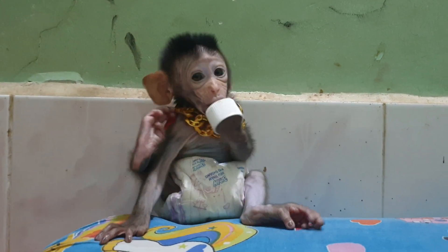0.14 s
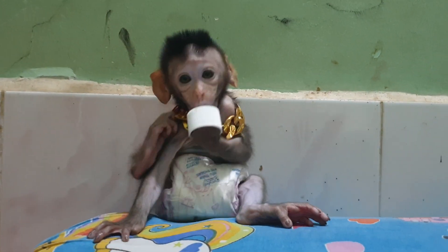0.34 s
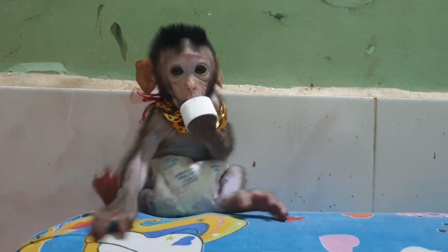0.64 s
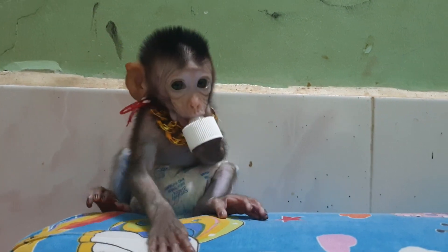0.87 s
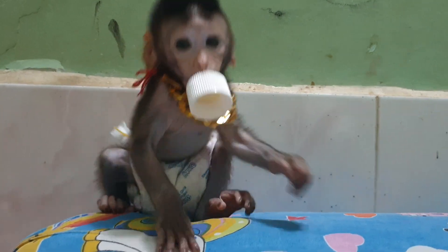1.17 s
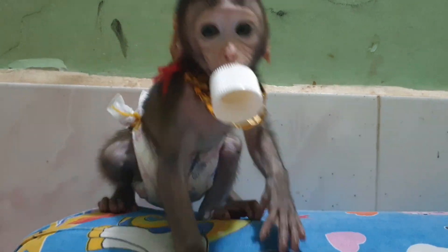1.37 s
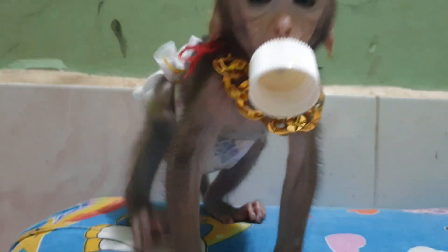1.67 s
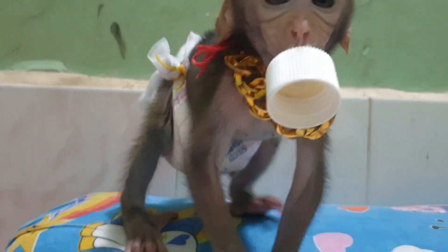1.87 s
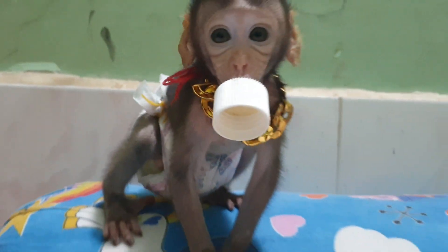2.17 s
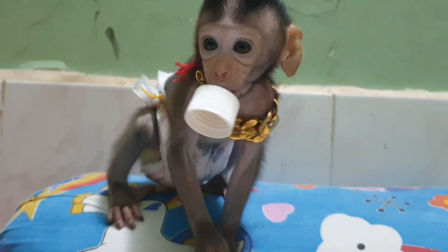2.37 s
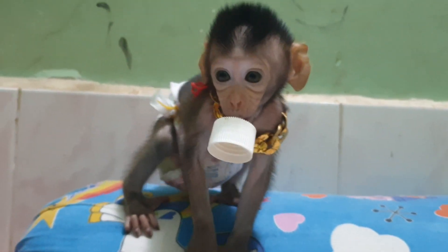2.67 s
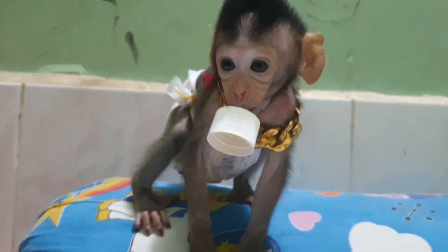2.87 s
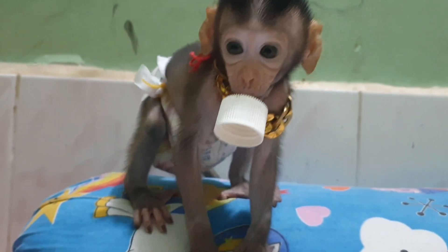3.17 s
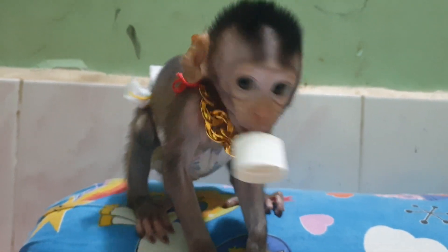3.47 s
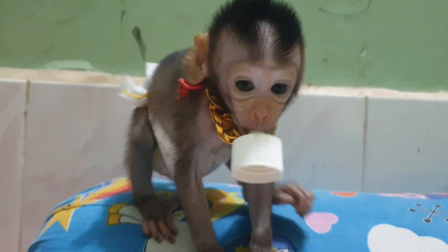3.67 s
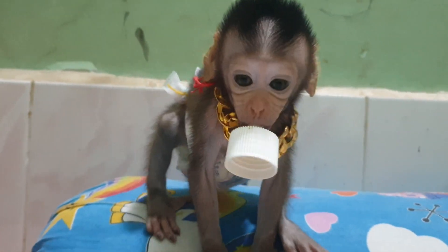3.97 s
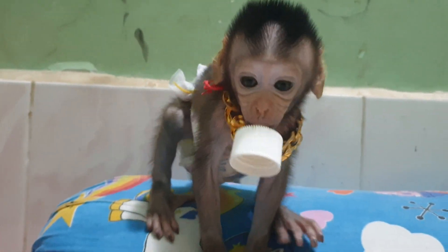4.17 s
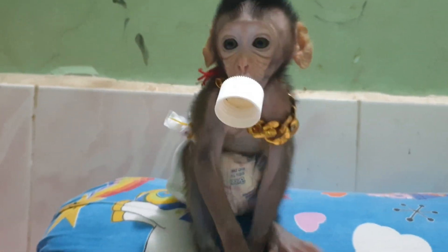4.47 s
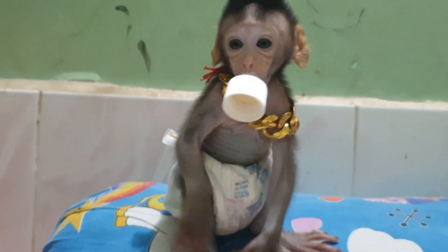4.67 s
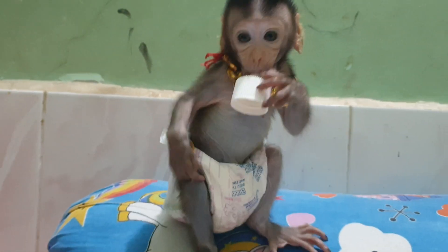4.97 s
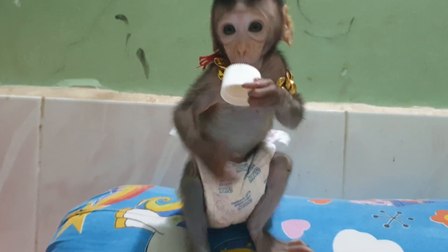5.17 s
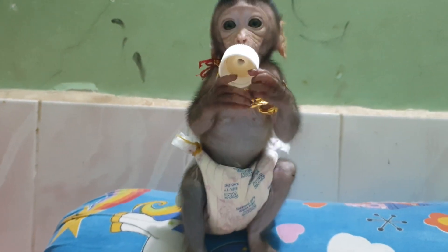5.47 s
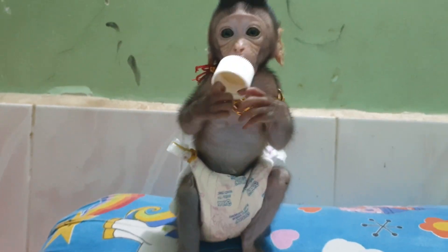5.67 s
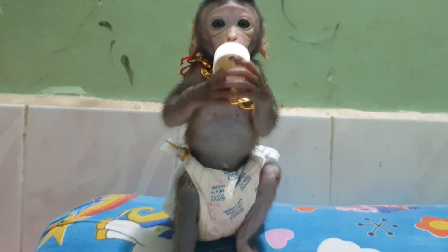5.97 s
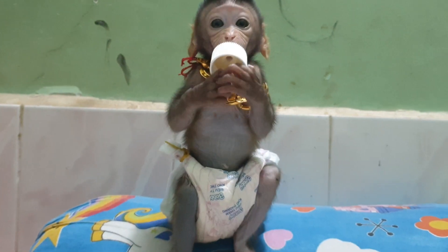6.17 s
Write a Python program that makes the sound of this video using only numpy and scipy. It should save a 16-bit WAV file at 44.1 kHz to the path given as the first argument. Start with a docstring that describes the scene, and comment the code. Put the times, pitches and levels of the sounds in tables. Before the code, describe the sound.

A small tiled room, heard close up in stereo, with steady low hum, rumble and soft, shifting hiss. A light tick of chain or plastic comes at 0.1 s, then at 0.3 s a baby monkey gives a tiny, high, arched squeak, about a twentieth of a second. Very faint ticks follow at 0.7 and 0.9 s. From about 1.4 s a weak coo rises, with a brief pitch flip and a brighter tick near 1.55 s, and at 1.7 s breaks into a louder, sharper squeak with a short tiled echo. Soft low thuds land at 2.0 and 2.4 s. Around 3.3 s there is a barely audible thin wheeze and tick, then gentle rubbing and low scuffing from 3.8 s. At 4.35 s a hard object clacks sharply, chattering briefly, with padded thuds. Faint rustling follows near 5 s; a faint high tone fades in during the last half second.

```python
"""Baby monkey calling in a tiled room

A baby monkey on a mattress, close by, with a plastic cap in its mouth: one short squeak, then a soft rising
coo that breaks into a louder squeak. Its voice is a stack of harmonics shaped by throat resonances.
Chain and cap tick as it crawls, in noise snaps; later a hard object clacks with decaying ringing partials.
The mattress thuds in low sines and rustles in noise, and the monkey wheezes faintly in a narrow noise band.
The room hums, rumbles and hisses; a thin tone ends it."""
import sys
import numpy as np
from scipy import signal
from scipy.fft import rfft, irfft, next_fast_len
from scipy.io import wavfile
from scipy.ndimage import uniform_filter1d, map_coordinates

SR = 44100
rng = np.random.default_rng(int(sys.argv[2]) if len(sys.argv) > 2 else 0)


def persist_wave(psi):
    """Save psi, clipped to +-1, as 16-bit WAV."""
    counts = np.round(np.clip(psi, -1, 1) * 32767).astype(np.int16)
    wavfile.write(sys.argv[1], SR, np.atleast_2d(counts).T)


N = 278623

# the two squeaks: (start [s], length [s], attack [s], top pitch [Hz], level at top pitch [dB],
# bend of the pitch arch [octaves/s^2], roughness at top pitch [0-1])
SQUEAKS = [(.303, .054, 0.0078, 1219, -26.5, 126, 0.06), (1.714, 0.094, 0.0024, 1290, -20, 273, 0.08)]
# path of the coo: (time [s], pitch [Hz], level before trim [dB])
COO_PATH = [(1.435, 1068, -51), (1.451, 1084, -47), (1.515, 1136, -49), (1.539, 1142, -49.5),
            (1.549, 1302, -33), (1.557, 1158, -39.5), (1.575, 1180, -43), (1.665, 1213, -35),
            (1.708, 1230, -35.5)]
# throat and mouth resonances of each call: (frequency [Hz], gain [dB])
FIRST_SQUEAK_THROAT = [(1000, -8), (1220, -.5), (2400, -6.5), (3650, -12.5), (4200, -23), (4870, -7),
                       (5400, -9), (6000, -12), (7300, -25.5), (8450, -21), (9600, -36), (10900, -9.5),
                       (12100, 5.5), (13200, -13), (14500, -30), (15800, -30)]
SECOND_SQUEAK_THROAT = [(1000, -4.5), (1280, -1.5), (2300, 1.5), (2600, -16.5), (3750, -18.5), (4930, 0.5),
                        (5300, -12), (6350, -15), (7600, -28), (8950, -17), (11400, -8.5), (12250, 2.5),
                        (13100, -13), (15400, -32)]
COO_THROAT = [(1200, 0), (2200, -15.5), (2450, -16), (3300, -8.5), (3700, -15.5), (4400, -32), (8000, -53),
              (10800, -34), (13300, -29), (15500, -42)]
# light ticks of chain and cap: (time [s], level before trim [dB], centre of the snap [Hz])
TICKS = [(.1282, -32, 6540), (.6934, -46, 2750), (.8795, -50.5, 5530), (1.5547, -27, 7040),
         (2.0179, -45.5, 5470), (3.3629, -44, 7000), (4.13, -43, 7000)]
# blows of the hard object: (time [s], level of the first contact [dB], contact length [s], its brightness [Hz])
CLACKS = [(4.3532, -18.5, 0.0015, 15000), (4.3737, -31, 0.016, 5000)]
# ringing partials of the object: (frequency [Hz], relative level [dB], 60 dB decay [s])
OBJECT_RINGING = [(910, -17.5, 0.027), (1473, 1, 0.015), (2145, -13.5, 0.023), (3204, -7, 0.044),
                  (3400, -8, .016), (4200, -13, 0.044), (5110, -8, 0.026), (5465, -3, 0.027),
                  (6220, 7, .012), (8140, -17, 0.018), (10000, -14, 0.018), (10850, -6, 0.009),
                  (11930, 0, 0.01)]
# soft thuds of limbs on the mattress: (time [s], level [dB], frequency [Hz])
THUDS = [(2.018, -38.5, 118), (2.41, -39, 75), (4.361, -30.5, 112), (4.4, -31, 71), (4.419, -44, 198),
         (4.451, -34.5, 77)]
# rubs on the mattress, and at 3.3 s a faint thin wheeze of the monkey:
# (middle [s], length [s], level [dB], centre [Hz], sharpness [Q])
RUBS_AND_WHEEZE = [(.094, 0.1, -58.5, 6500, 3.1), (.92, 0.038, -59, 9200, 8), (1.499, 0.17, -58, 5970, 7.6),
                   (1.536, .06, -53.5, 11800, 9), (2.6, .25, -70, 4800, 4), (3.3, 0.22, -70, 4430, 26),
                   (3.411, 0.14, -61, 7150, 3.6), (3.828, .18, -60.5, 5030, 1.6),
                   (4.021, .14, -57, 387.6, 53), (4.098, 0.11, -58, 5070, 2),
                   (4.439, 0.048, -52.5, 292, 5.6), (4.995, .55, -60, 5930, 0.5)]
# extra phase between left and right port, as sound bends round the body between them: (frequency [Hz], lag [rad])
PORT_LAG = [(20, 0), (300, .2), (1250, .75), (2550, 1.7), (3100, 4.1), (3800, 4.3), (5000, 6.1),
            (6200, 7.5), (7100, 11.6), (9000, 12.3), (12200, 14.8), (16000, 20)]
# decay of the room: (frequency [Hz], 60 dB decay [s])
ROOM_DECAY = [(150, 0.21), (1200, 0.48), (2500, 0.47), (3600, 0.39), (4900, 0.45), (6300, 0.25),
              (8000, 0.25), (12000, 0.31), (16000, 0.1)]
# early echoes off the walls: (delay [s], level [dB])
WALL_ECHOES = [(.0062, -23), (.0135, -24), (.0225, -21), (.0385, -23), (.046, -22)]
# colour of the room's noise: (frequency [Hz], relative level [dB per Hz])
ROOM_TONE = [(25, -23), (50, -3), (90, -12.5), (170, -16.5), (400, -16), (650, -16), (1150, -15),
             (1600, -17.5), (2300, -24), (2850, -24), (3450, -29), (4600, -25), (7200, -24), (9500, -28),
             (12500, -25.5), (16000, -41)]
# how alike the room's noise is at the two ports: (frequency [Hz], likeness [0-1])
PORT_LIKENESS = [(100, .99), (450, .92), (900, .7), (1550, .72), (2300, .2), (12000, .22)]
# hum of an appliance: (frequency [Hz], level before trim [dB])
HUM = [(48.4, -67), (70.0, -62), (102.3, -62.5)]
# swells of the low noise: (time [s], rumble before trim [dB], air before trim [dB])
LOW_NOISE = [(0.0, -55.5, -59.5), (1.87, -53.5, -62.5), (2.18, -58, -63), (2.59, -55.5, -63),
             (3.71, -62.5, -62.5), (4.08, -54, -60), (6.02, -52.5, -60), (6.32, -54.5, -61)]
# swells of the hiss: (time [s], level before trim [dB])
HISS = [(0.0, -60.5), (0.93, -67), (1.34, -65.5), (1.69, -58), (1.97, -66.5), (2.27, -67), (4.1, -62.5),
        (5.14, -62.5), (5.38, -65.5), (6.32, -64)]


def squeak(row, throat):
    """A quick arch of pitch; level, roughness and brightness follow its sag from the top."""
    start, length, attack, top_hz, db, bend, rough = row
    top_after_s, scoop_octaves, scoop_s = 0.0175, 0.284, 0.0022
    t = np.arange(0, length, 1 / SR)
    # the pitch scoops up from below into the arch
    scoop = scoop_octaves * np.exp(-t / scoop_s)
    sag = bend * (t - top_after_s) ** 2 + scoop
    # off the top pitch the voice is weaker and rougher
    gain = amp(db - 60.5 * sag) * fade(t, attack, release=0.0053)
    roughness = rough + 0.67 * sag
    # the voice is most pressed, so brightest, a little below the top
    bright_db_per_octave = 1.46 - 21.5 * np.abs(sag - 0.064)
    pitch = top_hz * 2 ** -sag
    return call(start, pitch, gain, roughness, bright_db_per_octave, throat, jitter=0.05, rasp=1.2)


def coo():
    """A soft rising note with one flip of pitch; it grows purer as it swells."""
    end_s, trim_db, fade_s = 1.716, 1.8, 0.0034
    t = np.arange(COO_PATH[0][0], end_s, 1 / SR)
    pitch, db = curves(COO_PATH, t)
    gain = amp(db + trim_db) * fade(t, fade_s, fade_s)
    # the weaker the note, the brighter its overtones
    bright_db_per_octave = 0.24 * (-37.5 - db)
    return call(t[0], pitch, gain, 0.092, bright_db_per_octave, COO_THROAT, jitter=0.08, rasp=1, waver_db=2.5)


def call(start, pitch, gain, rough, bright_db_per_octave, throat, jitter, rasp, waver_db=0):
    """One call: the harmonics of the vocal folds sweep through the throat's resonances."""
    size = len(pitch)
    smooth_pitch = uniform_filter1d(pitch, size=90)
    shaky_pitch = smooth_pitch * (1 + jitter * rough * wobble(902, size))
    phase = 2 * np.pi * np.cumsum(shaky_pitch) / SR
    voice = np.zeros(size)
    for k in range(1, 15):
        # uneven closure of the folds spreads each harmonic into a skirt
        flutter = 1 + rasp * rough * wobble(1200, size)
        # overtones waver in strength, the fundamental does not
        waver = waver_db * (k > 1) * wobble(34, size)
        level = along(throat, k * shaky_pitch) + bright_db_per_octave * np.log2(k) + waver
        harmonic = np.sin(k * phase + rng.uniform(0, 2 * np.pi))
        voice += amp(level) * flutter * harmonic
    out = np.zeros(N)
    add(out, start, np.sqrt(2) * gain * voice)
    # so small a mouth radiates almost nothing below the pitch
    return filtered(out, lambda f: 1 / np.sqrt(1 + (950 / (f + 1)) ** 16))


def closing_tone():
    """A faint sine fades in over the last half second, the opening of a slow 3 s swell cut off at the end."""
    out = np.zeros(N)
    t = np.arange(0, 3, 1 / SR)
    tone = np.sin(2 * np.pi * 2852 * t)
    add(out, N / SR - 0.5, amp(-55) * np.hanning(len(t)) * tone)
    return out


def ticks():
    """Tiny contacts of chain and cap: a bright snap of noise over a faint hollow knock."""
    out, t = np.zeros(N), np.arange(SR // 10) / SR
    for start, db, hz in TICKS:
        snap_envelope = amp(-60 * t / 0.016) * (1 - np.exp(-t / 0.000052))
        snap = band_noise(hz, 2.9, len(t)) * snap_envelope
        knock = amp(-12 - 60 * t / 0.044) * np.sin(2 * np.pi * 750 * t)
        add(out, start, amp(db - 3) * (snap + knock))
    return out


def clack():
    """A hard object strikes, chatters and lands again; each later contact of a blow is softer and duller."""
    out = np.zeros(N)
    for start, db, length, bright_hz in CLACKS:
        for k in range(3):
            # contacts 2.8 ms apart, 5 dB and then 20 dB below the first
            blow = contact(length, bright_hz * 0.87 ** k)
            add(out, start + k * 0.0028, amp(db - 5 * k * k) * blow)
    return out


def contact(length, bright_hz):
    """One contact: the object's partials ring under a crack of noise, dulled by a gentle low-pass."""
    t = np.arange(SR // 5) / SR
    ring = np.zeros(len(t))
    for hz, db, t60 in OBJECT_RINGING:
        # each contact excites the partials a little differently
        envelope = amp(db + rng.normal(0, 1) - 60 * t / t60)
        ring += envelope * np.sin(2 * np.pi * hz * t + rng.uniform(0, 2 * np.pi))
    crack = band_noise(5100, 0.78, len(t)) * np.exp(-2 * t / length)
    onset = 1 - np.exp(-t / 0.00023)
    blow = (amp(-4) * ring + amp(-3) * crack) * onset
    b, a = signal.butter(1, bright_hz, fs=SR)
    return signal.lfilter(b, a, blow)


def thuds():
    """Limbs land on the soft padding: a low sine with a soft onset and quick decay."""
    out, t = np.zeros(N), np.arange(SR // 2) / SR
    for start, db, hz in THUDS:
        envelope = amp(db - 60 * t / 0.096) * (1 - np.exp(-t / 0.0028))
        add(out, start, envelope * -np.sin(2 * np.pi * hz * t))
    return out


def rubs_and_wheeze():
    """Swells of grainy band noise, finer for the higher bands; the narrow one at 3.3 s is a thin wheeze."""
    out = np.zeros(N)
    for middle, length, db, hz, q in RUBS_AND_WHEEZE:
        # the whole swell spans 2.1 lengths
        size = int(2.1 * length * SR)
        grain = amp(2.7 * wobble(hz / 20, size))
        grainy_noise = unit(band_noise(hz, q, size) * grain)
        start = max(middle - size / SR / 2, 0)
        add(out, start, amp(db) * np.hanning(size) * grainy_noise)
    return out


def scuffs():
    """Once the monkey sits back, the padding scuffs at random: low noise, swelling and sinking."""
    out = np.zeros(N)
    moves = amp(3.5 * wobble(14, N))
    scuffing = unit(band_noise(215, 1.7, N) * moves)
    add(out, 3.82, amp(-60.5) * scuffing)
    return out


def place(x, right_db, lag=1, shadow_hz=0):
    """Two microphone ports: the left one hears a sound sooner, the right one louder (above shadow_hz)."""
    side = np.array([[-1], [1]]) / 2

    def port_response(f):
        level_db = side * right_db * f * f / (f * f + shadow_hz ** 2 + 1)
        return amp(level_db) * np.exp(-1j * side * lag * along(PORT_LAG, f))

    return filtered(x, port_response)


def room(x):
    """Tiled walls answer with a few distinct echoes and a bright diffuse tail of decaying noise."""
    hz, t, spectrum = signal.stft(rng.standard_normal((2, SR // 2)), SR, nperseg=256)
    decay = amp(-60 * t / along(ROOM_DECAY, hz)[:, None])
    build_up = 1 - np.exp(-t / 0.0042)
    tail = signal.istft(spectrum * decay * build_up, SR, nperseg=256)[1]
    tail *= amp(-15) / np.linalg.norm(tail[0])
    for delay, db in WALL_ECHOES:
        for port in tail:
            # each port hears the echo at a slightly different moment
            port[int((delay + rng.uniform(0, 0.0005)) * SR)] += amp(db)
    return signal.fftconvolve(x[None], tail, axes=1)[:, :N]


def background():
    """An appliance hums over low rumble and airy noise; the hiss slowly swells and sinks."""
    t = np.arange(N) / SR
    rumble_db, air_db = curves(LOW_NOISE, t)
    hiss_db, = curves(HISS, t)
    hum = np.zeros(N)
    for hz, db in HUM:
        # each partial drifts a little in level and phase
        level = amp(db + 1.5 * wobble(4, N))
        hum += level * np.sin(2 * np.pi * hz * t + 0.3 * wobble(4, N))
    rumble = amp(rumble_db - 1.0 + 1.5 * wobble(5, N)) * room_noise(42, 140, right_db=1.3)
    air = amp(air_db + 6.5) * room_noise(150, 3200, right_db=1.7)
    hiss = amp(hiss_db + 2.0) * room_noise(3900, 17000, right_db=3.3)
    placed_hum = place(np.sqrt(2) * amp(-0.3) * hum, right_db=1.2, lag=2.6)
    return rumble + air + hiss + placed_hum


def room_noise(lo_hz, hi_hz, right_db):
    """One register of the room's noise: long waves reach both ports alike, short ones do not."""
    def shape(f):
        band_edges = np.sqrt((1 + (lo_hz / (f + 1)) ** 8) * (1 + (f / hi_hz) ** 8))
        return amp(along(ROOM_TONE, f)) / band_edges

    shared = filtered(rng.standard_normal(N), lambda f: shape(f) * np.sqrt(along(PORT_LIKENESS, f)))
    own = filtered(rng.standard_normal((2, N)), lambda f: shape(f) * np.sqrt(1 - along(PORT_LIKENESS, f)))
    return unit(place(shared + own, right_db, lag=2.6))


def amp(db):
    """Decibels to gain."""
    return 10 ** (np.asarray(db) / 20)


def unit(x):
    """Scale to rms 1."""
    return x / np.sqrt(np.mean(x ** 2) + 1e-20)


def along(points, hz):
    """Read (frequency [Hz], value) points on a log frequency axis."""
    f, v = np.transpose(points)
    return np.interp(np.log(hz + 1), np.log(f + 1), v)


def curves(rows, t):
    """Each column after the time, read at the times t."""
    s, *columns = np.transpose(rows)
    return [np.interp(t, s, column) for column in columns]


def wobble(rate, size):
    """A smooth random curve, rate knots a second."""
    knots = rng.standard_normal(int(size * rate / SR) + 4)
    return map_coordinates(knots, [np.arange(size) * rate / SR])


def fade(t, attack, release):
    """A straight rise, a hold and a straight fall over the times t."""
    return np.clip((t - t[0]) / attack, 0, 1) * np.clip((t[-1] - t) / release, 0, 1)


def filtered(x, response):
    """Filter x by a complex response of frequency."""
    size = x.shape[-1]
    m = next_fast_len(size + 8192)
    return irfft(rfft(x, m) * response(np.fft.rfftfreq(m, 1 / SR)), m)[..., :size]


def band_noise(hz, q, size):
    """Noise of rms 1 through one resonance."""
    def resonance(f):
        damping = 1j * f * hz / q
        return damping / (hz * hz - f * f + damping)

    return unit(filtered(rng.standard_normal(size), resonance))


def add(track, s, x):
    """Mix x into the track at time s, cut off at the track's end."""
    part = track[round(s * SR):][:len(x)]
    part += x[:len(part)]


def scene():
    """The monkey and its things close by, the room around them."""
    first = squeak(SQUEAKS[0], FIRST_SQUEAK_THROAT)
    second = squeak(SQUEAKS[1], SECOND_SQUEAK_THROAT)
    soft = coo() + closing_tone()
    hits = ticks() + clack()
    direct = place(first + hits, right_db=7)
    # in the second squeak the right port is louder mainly in the overtones
    direct += place(second, right_db=7, shadow_hz=1500)
    direct += place(soft, right_db=0.5)
    direct += place(thuds() + rubs_and_wheeze() + scuffs(), right_db=2)
    return direct + room(first + second + soft + hits) + background()


def record(dry):
    """A steep low-pass: almost nothing is kept above the 16.2 kHz band limit."""
    return filtered(dry, lambda hz: 1 / np.sqrt(1 + (hz / 16200) ** 160))


dry = scene()
out = record(dry)
persist_wave(out)
```